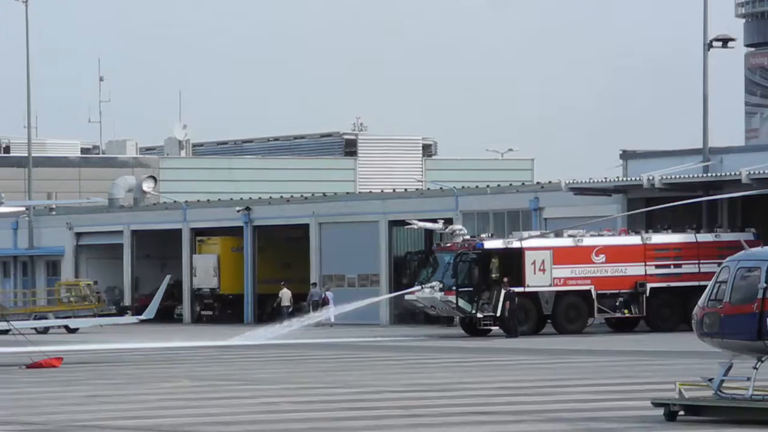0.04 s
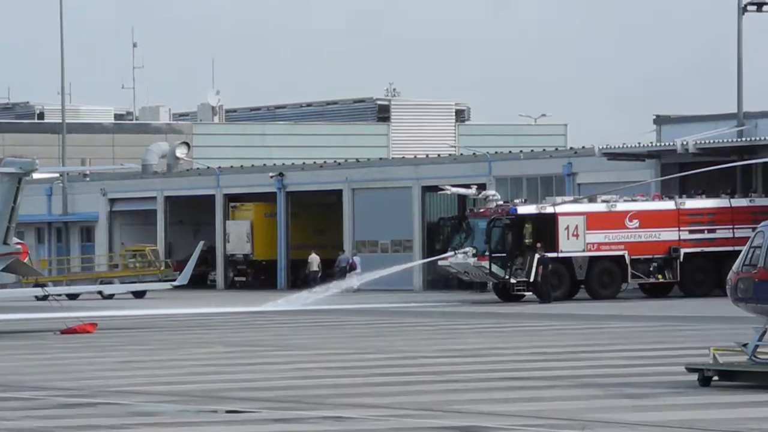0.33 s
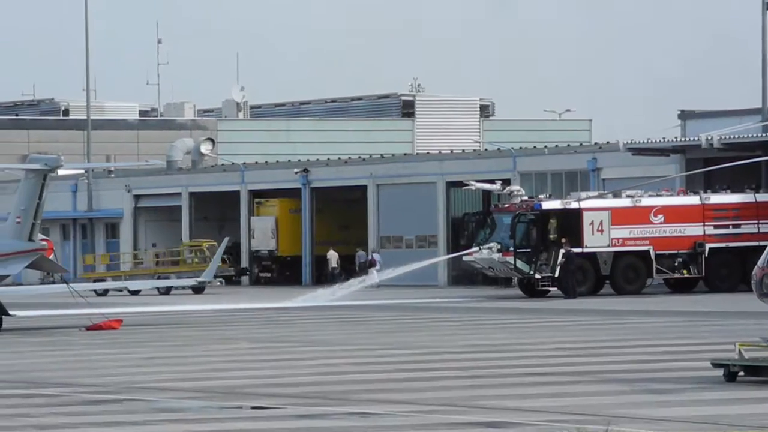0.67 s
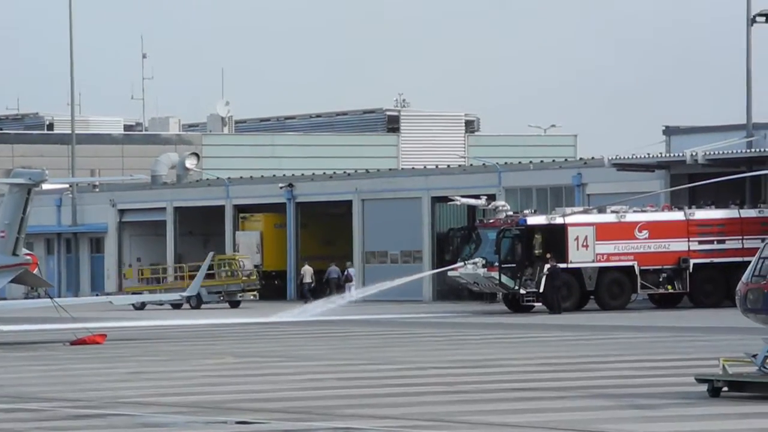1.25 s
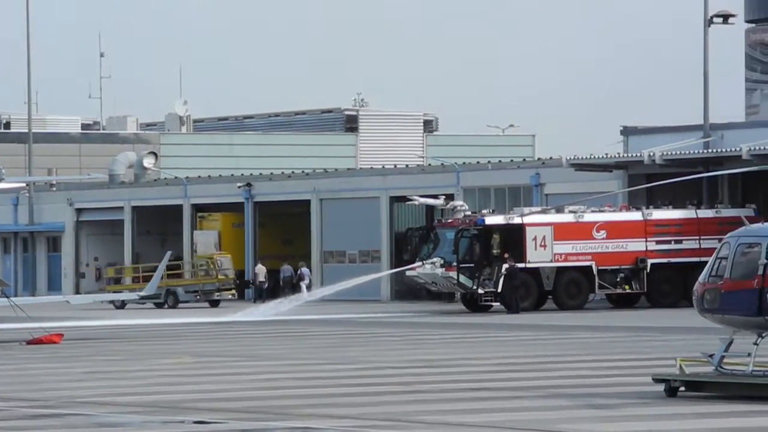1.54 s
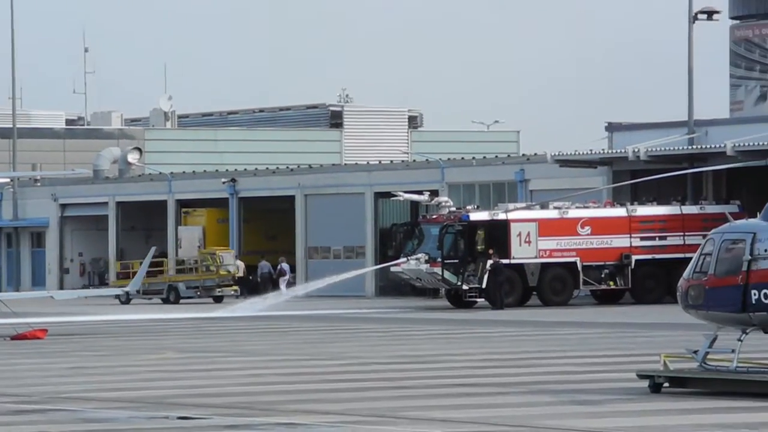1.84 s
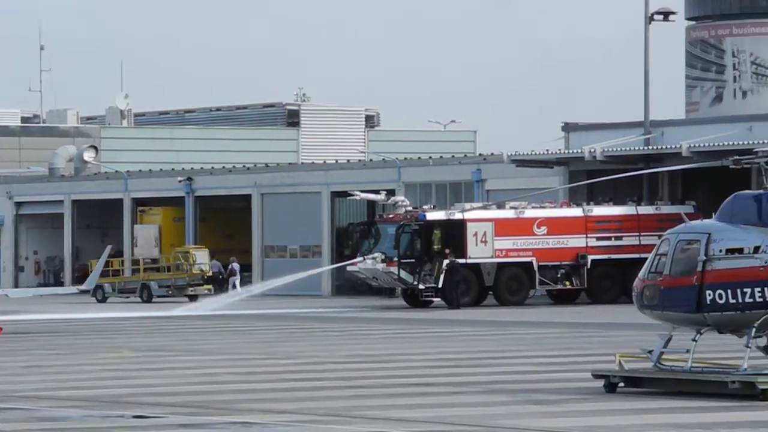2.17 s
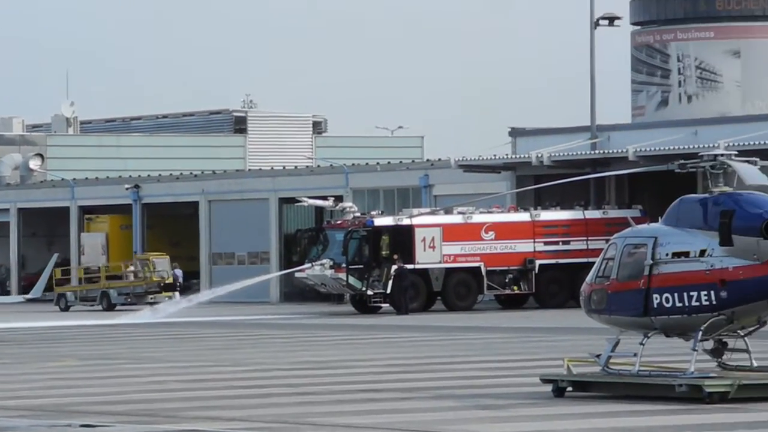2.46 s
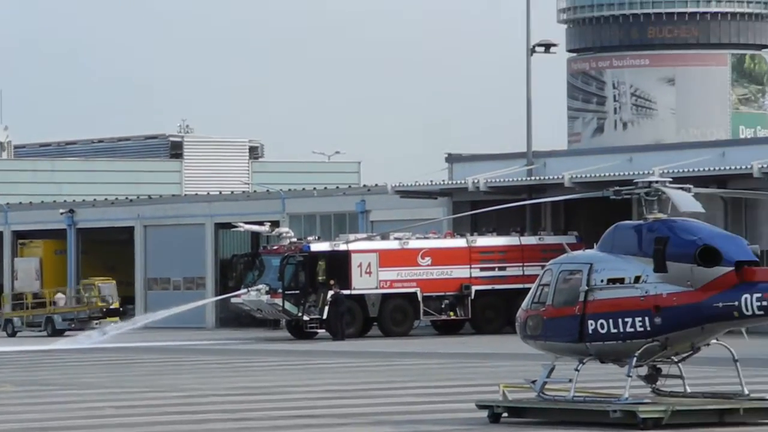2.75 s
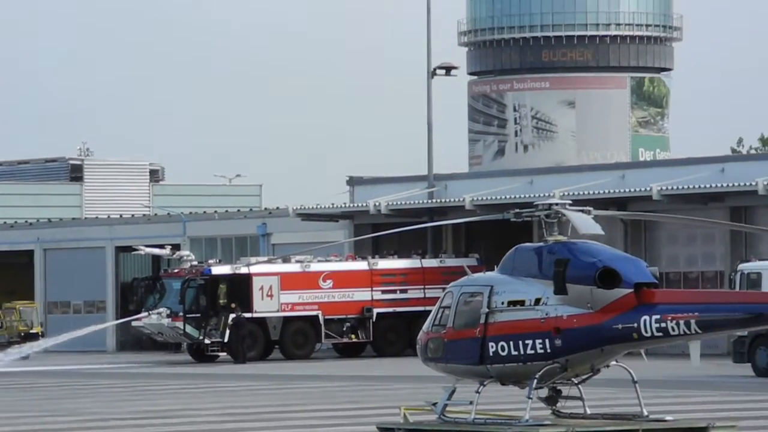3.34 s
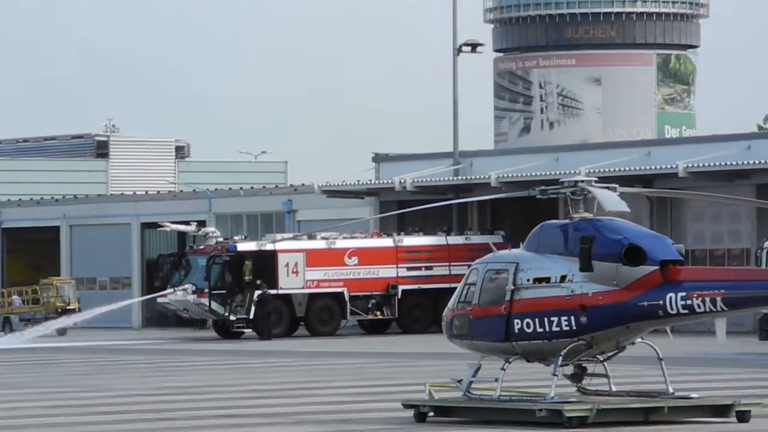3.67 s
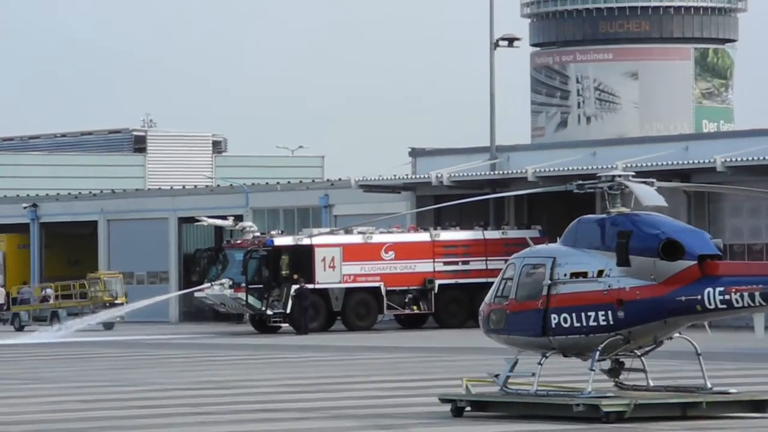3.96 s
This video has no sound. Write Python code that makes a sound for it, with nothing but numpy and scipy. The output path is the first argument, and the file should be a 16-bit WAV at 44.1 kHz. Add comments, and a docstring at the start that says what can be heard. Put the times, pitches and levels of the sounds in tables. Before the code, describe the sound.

A fire truck's diesel engine drones and throbs some way off on an airport apron, while its pump churns and a water jet rushes steadily. A faint high whine runs underneath, and light gusts later brush the microphone.

```python
"""A fire truck's diesel drones and throbs as it pumps a jet of water across an airport apron, some way off.
Puffs of exhaust ring the pipe and body over a low rumble, while engine tones fade and swell.
The spray rushes, churning water rattles the pump casing, and a fast shaft, probably a turbine, whines.
Gusts brush the microphone in the second half. The sound switches on and comes up over a moment."""
import sys
import numpy as np
from scipy import signal
from scipy.fft import rfft, irfft
from scipy.io import wavfile

SR = 44100
rng = np.random.default_rng(int(sys.argv[2]) if len(sys.argv) > 2 else 0)


def log_audio(samples):
    """Write samples as a 16-bit WAV file to the path given in sys.argv[1]."""
    # one column per channel
    frames = np.atleast_2d(samples).T
    # limit to full scale, then quantise
    limited = np.clip(frames, -1, 1)
    pcm = np.round(limited * 32767).astype(np.int16)
    wavfile.write(sys.argv[1], SR, pcm)


N = 176400
T = np.arange(N) / SR
FREQS = np.maximum(np.fft.rfftfreq(N, 1 / SR), 1)


# firing rate, sagging under load (time [s], pitch [Hz])
FIRING_PITCH = [(0, 111.3), (1.0, 109.2), (1.5, 107.5), (2.2, 107.5), (3.0, 105.2), (4, 105.2)]

def diesel():
    """Each firing lets out a puff of gas: the puffs make a note and pulse the boom and rumble."""
    firing = angle(curve(FIRING_PITCH) * (1 + 0.0046 * walk(3)))
    puffs = 1 + 0.47 * np.cos(firing)
    drone = (exhaust_note(firing) + hums()) * pan(db=-1)
    return drone + boom(puffs) + throbs() + rumble(puffs)


# exhaust and body resonances (centre [Hz], width [Hz], level [dB])
BOOM_MODES = [(110.2, 25, -32), (139.7, 3.6, -35), (161, 14.5, -27.5), (179.7, 10.8, -29),
              (218, 13.5, -38.5), (240.4, 30, -33)]
# slow swell of the boom (time [s], gain [dB])
BOOM_SWELL = [(0.25, -5), (0.38, -1.5), (0.64, -3), (1.08, -0.5), (1.46, 1), (1.7, -1.5), (2.05, -1),
              (2.2, -4.5), (2.4, -1), (2.76, -2.5), (3.1, -1.5), (3.5, -3.5), (3.83, -2), (4, 0)]

def boom(puffs):
    """Puffs of gas ring the exhaust and body with a hollow boom."""
    ring = sum(undb(db) * air(resonance(hz, width), puffs) for hz, width, db in BOOM_MODES)
    return undb(curve(BOOM_SWELL)) * ring


# exhaust throbs (time [s], length [s], level [dB])
THROBS = [(0.35, 0.052, -20.5), (0.46, 0.052, -21), (0.521, 0.017, -19.5), (0.63, .03, -21),
          (0.742, 0.016, -15), (0.824, 0.038, -21), (0.967, 0.028, -19.5), (1.117, 0.019, -22),
          (1.397, .03, -22.5), (1.86, .025, -18.5), (1.967, 0.021, -21), (2.02, 0.023, -18),
          (2.12, .016, -20.5), (2.286, 0.027, -19.5), (2.333, .022, -19), (2.638, 0.067, -20.5),
          (2.846, .02, -17), (2.9, .022, -20), (3.048, .05, -21.5), (3.1, .035, -23), (3.327, 0.03, -21.5),
          (3.756, .027, -19.5), (3.829, 0.028, -19.5)]

def throbs(centre_hz=171.7, spread=0.062):
    """The exhaust throbs in short, ragged swells, each at its own pitch near the main resonance."""
    out = 0
    wobble = 0.55 * walk(59)
    for at, length, db in THROBS:
        detune, start = rng.uniform(-1.07, 1, 2)
        hz = centre_hz * (1 + spread * detune)
        ring = np.sin(2 * np.pi * hz * (T - at) + np.pi * start + wobble)
        out = out + undb(db) * swell(at, length) * unit(ring)
    return out * pan(db=-1.2)


# envelope of the exhaust note (time [s], level [dB])
NOTE_LEVEL = [(0.2, -31.5), (0.8, -31), (1.3, -28.5), (1.65, -30.5), (2.1, -27), (2.5, -29), (3.0, -31.5),
              (3.5, -31), (4, -33)]

def exhaust_note(firing):
    """A low tone at the firing rate, wavering in level."""
    level_db = curve(NOTE_LEVEL) + 2.5 * walk(6.7)
    return undb(level_db) * tone(firing, scatter=0.28, rate=14)


# engine hums (pitch [Hz], level [dB], waver [dB], peak time [s], length [s])
HUMS = [(61.04, -31.5, -1.5, 1.8, 20), (215.5, -35.5, 2, 1.7, 4.7), (322.8, -43.5, 2, 1.3, 1.9),
        (369, -43, 3, 2.56, 2.2), (419.3, -47, 2.5, 2.6, 10), (731, -51, 1.5, 1.4, 3.2)]

def hums():
    """Engine tones come and go, each drifting slightly in pitch."""
    out = 0
    for hz, db, waver_db, at, length in HUMS:
        envelope = swell(at, length) * undb(db + waver_db * walk(4.9))
        phase = angle(hz * (1 + 0.0039 * walk(2.45)))
        out = out + envelope * tone(phase, scatter=0.07, rate=4.8)
    return out


# tone colour of the rumble (frequency [Hz], relative level [dB])
RUMBLE_EQ = [(20, -32), (35, -31), (50, -9), (75, 2), (125, -3.5), (165, 3), (200, -3), (260, -6.5),
             (305, -15.5), (420, -13.5), (560, -24.5), (1200, -51.5)]

def rumble(puffs, level_db=-30):
    """A broad bed of low noise pulses with the firing."""
    return undb(level_db) * air(undb(spectrum(RUMBLE_EQ)), puffs)


# tone colour of the water jet (frequency [Hz], relative level [dB])
SPRAY_EQ = [(250, -4.5), (450, -2), (570, -7.5), (800, 0), (980, -2.5), (1400, 0), (2100, -3), (3000, -7),
            (3900, -6.5), (4400, -3), (5100, -9.5), (5600, -14), (6500, -16.5), (8000, -24), (10000, -32.5),
            (12500, -41), (15500, -73)]
# slow drift of the rush (time [s], gain [dB])
SPRAY_DRIFT = [(0.2, -1), (0.7, 0), (1.4, 0), (2.1, 0.15), (3.3, 0.04), (4, -0.8)]

def spray(level_db=-30, surge_db=0.53, flutter_db=0.5):
    """The jet breaks into drops: a dense rush that surges and flutters a little."""
    flow_db = curve(SPRAY_DRIFT) + surge_db * walk(1.1) + flutter_db * walk(37)
    return undb(level_db) * air(undb(spectrum(SPRAY_EQ)), undb(flow_db))


# pump and casing resonances (centre [Hz], width [Hz], level [dB])
CASING_MODES = [(388, 70, -38.5), (697, 95, -41.5), (1114, 84, -45), (1225, 43, -49), (1469, 21, -47.5),
                (1529, 58, -40), (1665, 94, -44.5), (1790, 106, -40.5), (2182, 59, -51.5), (2486, 110, -47),
                (3614, 150, -50)]

def pump():
    """Churning water rattles the casing, each resonance flickering by itself."""
    churn = undb(1.94 * walk(95))
    return sum(undb(db + 0.63 * walk(22)) * air(resonance(hz, width), churn)
               for hz, width, db in CASING_MODES)


# shaft speed (time [s], speed [turns/s])
SHAFT_SPEED = [(0, 407.5), (1.0, 407.7), (2.0, 407.6), (3.0, 407.3), (4, 407.1)]
# envelopes of the shaft's fundamental and three strong harmonics (time [s], level [dB])
FUNDAMENTAL = [(0.2, -57), (2.0, -51), (2.7, -42.5), (3.25, -44), (3.53, -38.5), (4.0, -39.5)]
TENTH = [(0.28, -52), (0.37, -44), (0.76, -59), (0.98, -44.5), (1.3, -49.5), (1.62, -47), (1.79, -42.5),
         (2.0, -41.5), (2.17, -41), (2.4, -50), (2.8, -52), (3.09, -44), (3.18, -48.5), (3.38, -44),
         (3.73, -55), (3.9, -47), (4.0, -54)]
TWELFTH = [(0.2, -64), (1.0, -53), (1.7, -53.5), (2.5, -46), (3.0, -49), (3.5, -47.5), (4.0, -55)]
THIRTEENTH = [(0.2, -53), (0.65, -51), (1.1, -56), (2.2, -51.5), (2.8, -54), (3.45, -47), (4.0, -51.5)]
# faint harmonics (harmonic [number], level [dB], pan L-R [dB], scatter [ratio])
FAINT_HARMONICS = [(6, -54.5, -1, 0.49), (9, -56, 3, 0.74), (16, -73, 0, .8), (19, -71, 0, .8)]

def shaft_whine():
    """A fast shaft sings on harmonics of its speed, scattered on their way."""
    shaft = angle(curve(SHAFT_SPEED) * (1 + 0.00022 * walk(8)))
    out = undb(curve(TENTH)) * tone(10 * shaft, scatter=0.15, rate=16) * pan(db=-7.5)
    out += undb(curve(FUNDAMENTAL)) * tone(shaft, scatter=0.31, rate=17) * pan(db=-1.5)
    out += undb(curve(TWELFTH)) * tone(12 * shaft, scatter=0.37, rate=14) * pan(db=-8)
    out += undb(curve(THIRTEENTH)) * tone(13 * shaft, scatter=0.42, rate=32) * pan(db=5)
    for harmonic, db, pan_db, scatter in FAINT_HARMONICS:
        out += undb(db) * tone(harmonic * shaft, scatter, rate=14) * pan(pan_db)
    return out


# gusts on the microphone (time [s], length [s], level [dB])
GUSTS = [(2.13, 0.066, -32), (2.773, .08, -40), (2.983, 0.23, -27), (3.33, .14, -32), (3.71, 0.1, -24.5),
         (3.95, .1, -35)]
# tone colour of the buffeting (frequency [Hz], relative level [dB])
BUFFET_EQ = [(15, -18), (35, -13), (65, 2), (130, -2), (200, -12), (300, -14), (600, -50), (2000, -70)]

def wind():
    """Light gusts buffet each microphone port separately."""
    envelope = sum(undb(db) * swell(at, length) for at, length, db in GUSTS)
    buffet = rfft(rng.standard_normal((2, N))) * undb(spectrum(BUFFET_EQ))
    return envelope * unit(irfft(buffet, N))


# faint ticks close to the microphone (time [s], level [dB])
TICKS = [(3.247, -55), (3.311, -54)]

def ticks(decay_s=0.018):
    """Tiny bright ticks that die at once."""
    envelope = sum(undb(db) * (T >= at) * np.exp(-np.abs(T - at) / decay_s) for at, db in TICKS)
    return envelope * air(resonance(hz=11500, width=6000))


def blade_whistle(hz=10320, level_db=-72):
    """Spinning blades add a thin, shimmering whistle."""
    phase = angle(hz * (1 + 0.00045 * walk(3)))
    return undb(level_db) * tone(phase, scatter=0.7, rate=32)


# stereo likeness, capped at 1 = mono when played (frequency [Hz], likeness [ratio])
LIKENESS = [(40, 1), (100, 1), (170, 1.2), (300, 1.1), (500, 0.97), (1200, 0.83), (2000, 0.75),
            (3000, 0.33), (4500, -0.26), (9000, 0.12)]
# stereo balance (frequency [Hz], pan L-R [dB])
BALANCE = [(60, 0), (250, -2), (550, -2), (1200, -2.5), (2500, -3.5), (4300, -3.5), (5600, -1.2),
           (10000, -0.5)]

def air(gain, drive=1):
    """Filtered turbulence at two microphones, rms 1: alike in the bass, diffuse in the treble."""
    mid, side = rfft(rng.standard_normal((2, N)) * drive)
    like = np.clip(spectrum(LIKENESS), -1, 1)
    mid, side = mid * np.sqrt(1 + like), side * np.sqrt(1 - like)
    stereo = np.array([mid + side, mid - side]) * pan(spectrum(BALANCE))
    return unit(irfft(stereo * gain, N))


def tone(phase, scatter, rate):
    """A direct tone plus reflections that wander separately at each microphone."""
    paths = np.array([walk(rate) * np.cos(phase) + walk(rate) * np.sin(phase) for _ in range(2)])
    return unit(np.sin(phase) + scatter * paths)


def resonance(hz, width):
    """A steep resonance: two band-passes in a row."""
    return 1 / (1 + 1j * (FREQS / hz - hz / FREQS) * hz / (width * np.pi / 2)) ** 2


def angle(hz):
    """Phase of a gliding pitch, from a random start."""
    return 2 * np.pi * (np.cumsum(hz) / SR + rng.random())


def walk(rate):
    """Smooth random modulation of rms 1, rolling off above rate [Hz]."""
    noise = rfft(rng.standard_normal(N)) * (FREQS > 1)
    return unit(irfft(noise / (1 + (FREQS / rate) ** 4), N))


def swell(at, length):
    """A smooth rise and fall around a moment."""
    return np.exp(-2 * ((T - at) / length) ** 2)


def curve(rows):
    """Join (time [s], value) rows by straight lines."""
    return np.interp(T, *np.array(rows).T)


def spectrum(rows):
    """Join (frequency [Hz], value) rows on a log-frequency axis."""
    hz, values = np.array(rows).T
    return np.interp(np.log(FREQS), np.log(hz), values)


def pan(db):
    """Left and right gains for a level difference."""
    return undb(np.array([[1], [-1]]) * db / 2)


def undb(db):
    """Decibels to gain."""
    return 10 ** (np.asarray(db) / 20)


def unit(x):
    """Scale to rms 1."""
    return x / np.sqrt(np.mean(x ** 2))


def scene():
    """The truck runs throughout; a breeze picks up in the second half."""
    return diesel() + pump() + spray() + shaft_whine() + blade_whistle() + wind() + ticks()


def record(dry):
    """The sound switches on, rises to full level, and loses its very top."""
    start_s, start_db, rise_s, top_hz = 0.0974, -6.5, 0.059, 15200
    since = np.maximum(T - start_s, 0)
    gate = np.clip(since / 0.0034, 0, 1)
    rise = undb(start_db * np.exp(-since / rise_s))
    high_cut = signal.ellip(10, 0.2, 80, top_hz, fs=SR, output="sos")
    return signal.sosfilt(high_cut, dry * gate * rise)


dry = scene()
out = record(dry)
log_audio(out)
```